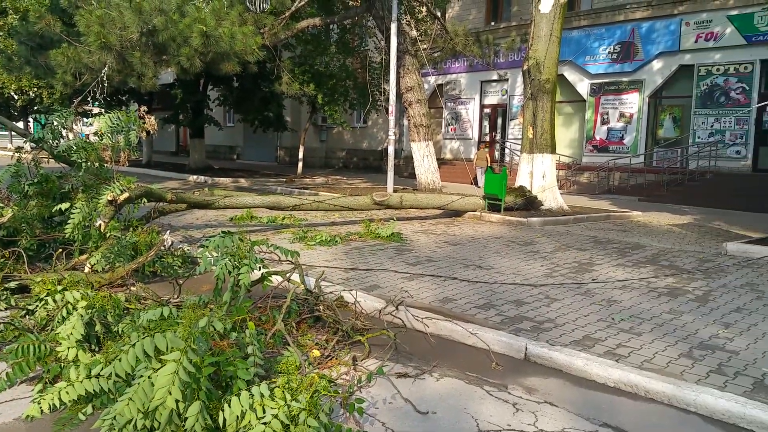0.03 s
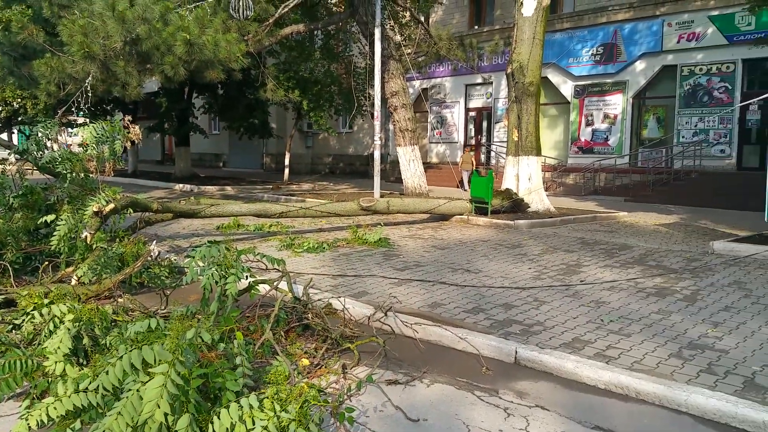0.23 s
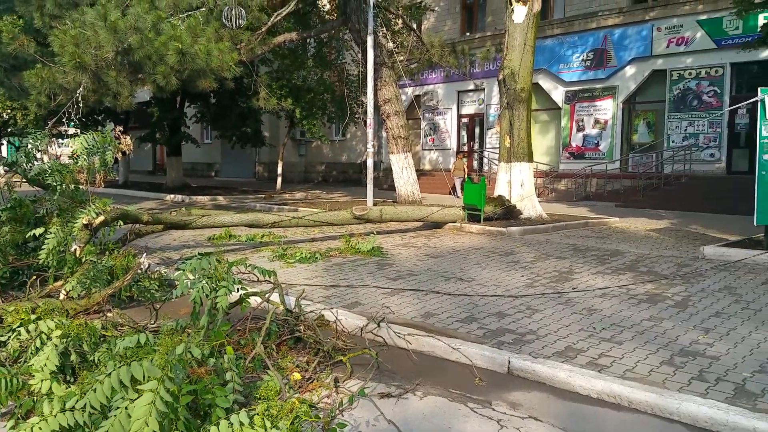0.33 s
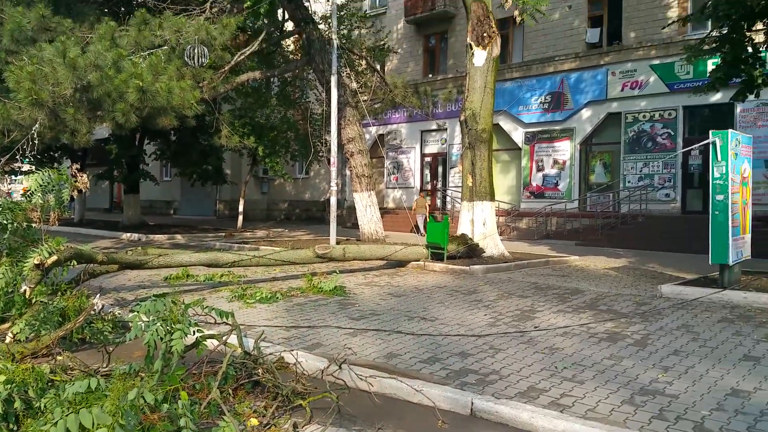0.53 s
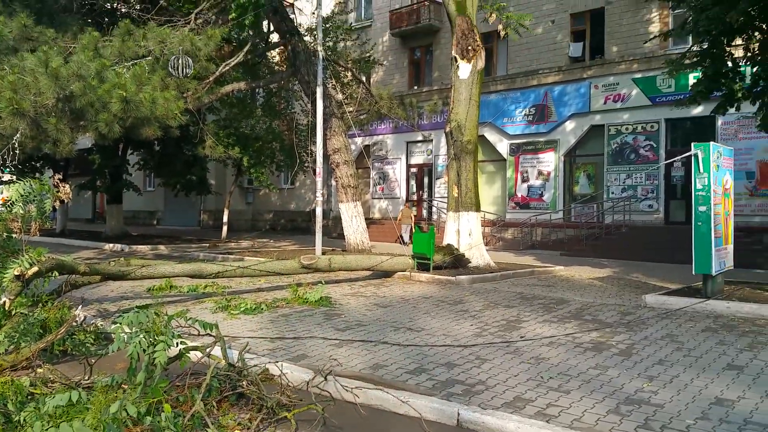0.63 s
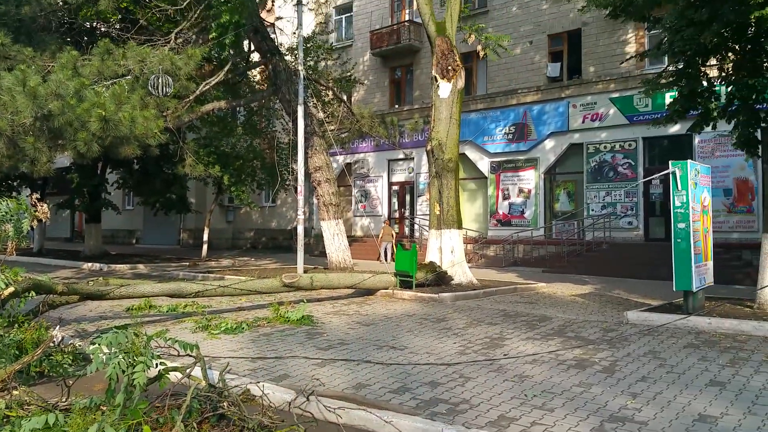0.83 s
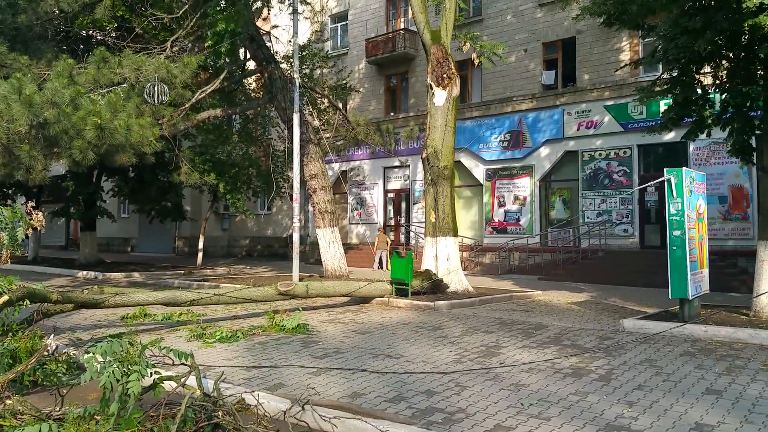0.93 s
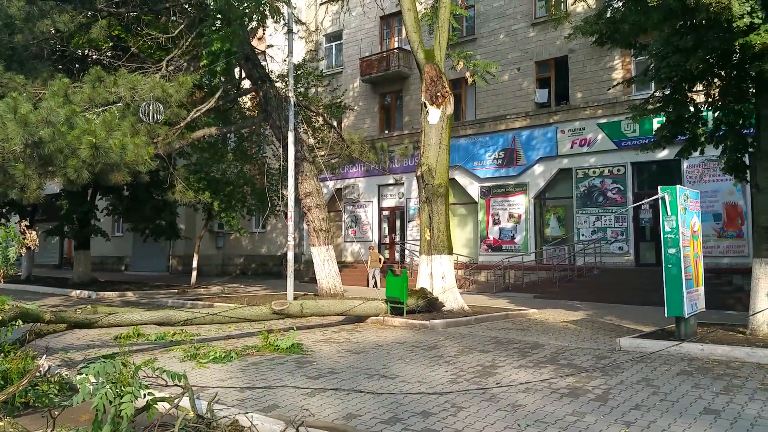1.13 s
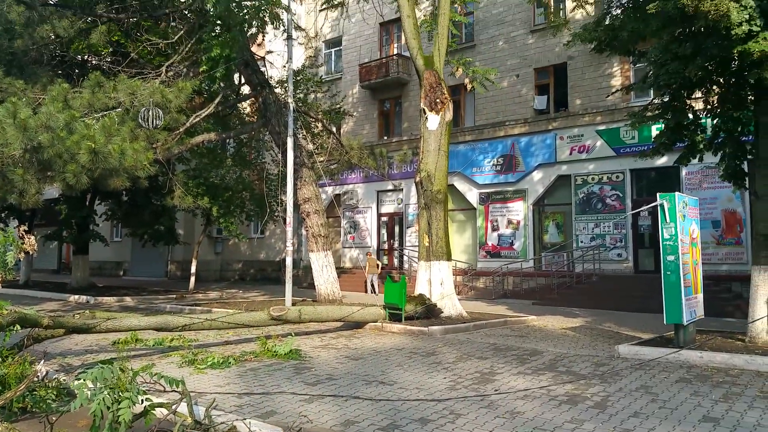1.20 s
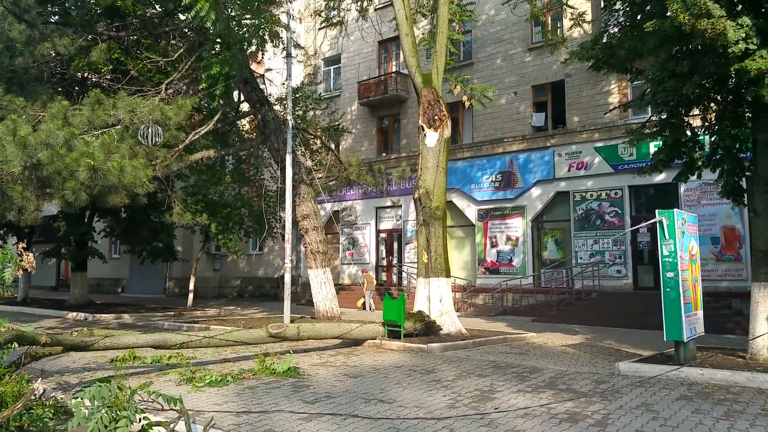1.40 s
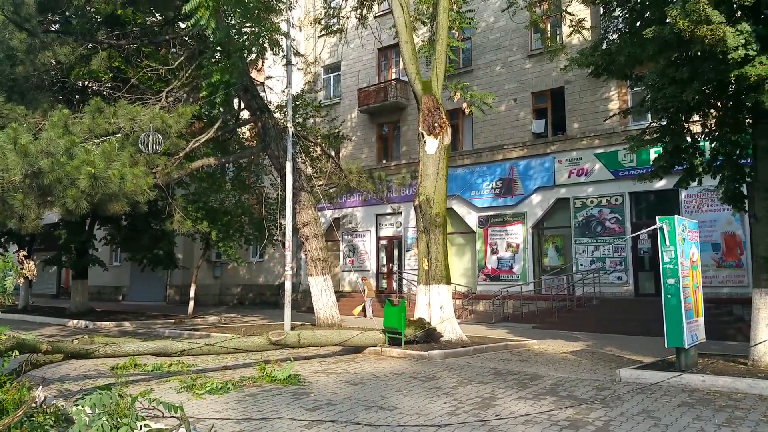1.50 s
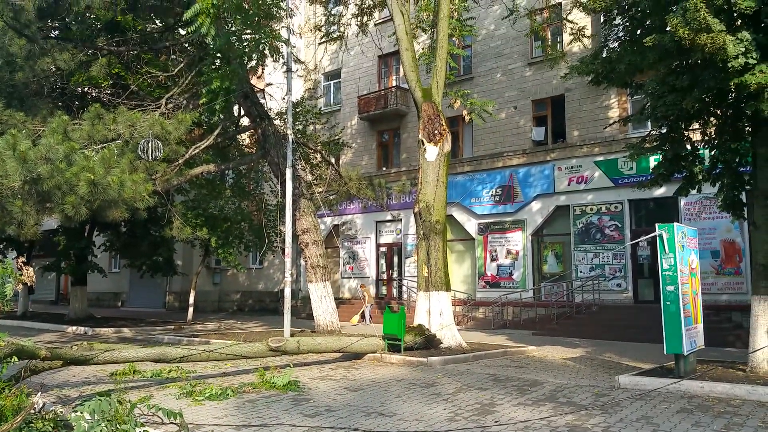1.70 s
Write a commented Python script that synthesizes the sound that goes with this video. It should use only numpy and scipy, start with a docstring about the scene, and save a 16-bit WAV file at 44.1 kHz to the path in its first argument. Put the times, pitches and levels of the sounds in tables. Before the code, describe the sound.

Wind rumbles and thumps on the microphone over distant traffic and faint bird chirps.

```python
"""Breeze on a quiet city street

A breeze rumbles and thumps on the right microphone opening of a hand-held phone, and crackles
where the air breaks over it. Mostly on the left are distant traffic, a fading high hiss and a
small bird whose chirps echo between the house fronts. A hollow swell rises at the very end."""
import sys
import numpy as np
from scipy import signal
from scipy.fft import rfft, irfft
from scipy.io import wavfile
from scipy.ndimage import uniform_filter1d

SR = 44100
rng = np.random.default_rng(int(sys.argv[2]) if len(sys.argv) > 2 else 0)


def wav_record(signal):
    """Record a signal, one row per channel, as 16-bit PCM in the file named by sys.argv[1]."""
    frames = np.transpose(np.atleast_2d(signal))
    bounded = np.clip(frames, -1, 1)
    # unit amplitude maps onto the largest positive 16-bit level
    quanta = np.round(bounded * 32767).astype(np.int16)
    wavfile.write(sys.argv[1], SR, quanta)


N = 77175  # 1.75 s

# Tone of each noise, from low to high (frequency [Hz], relative level [dB])
TRAFFIC_LEFT_TONE = [(20, -8), (60, -5), (110, -0.5), (220, -18.5), (400, -17), (700, -16), (1100, -18.5),
                     (1800, -19), (2900, -28.5), (4100, -25.5), (5000, -35.5), (6000, -46.5), (9000, -56)]
TRAFFIC_RIGHT_TONE = [(20, -12), (110, 1), (250, -3), (550, -9), (1000, -16.5), (2000, -23.5), (4000, -29),
                      (6000, -59)]
SWELL_TONE = [(280, -20), (440, -10), (600, 1), (760, -12), (1100, -11), (1700, -9), (2600, -34.5)]
HIGH_HISS_TONE = [(2000, -53), (3200, -5.5), (3900, 1), (4600, -0.5), (5200, -7.5), (5900, -32),
                  (9000, -62)]
WIND_LEFT_TONE = [(15, -36), (50, -15.5), (100, 2.5), (180, -7), (300, -9.5), (450, -16), (1000, -40),
                  (3000, -56)]
WIND_RIGHT_TONE = [(15, -9.5), (35, -5), (65, -3), (100, -7.5), (170, -14.5), (260, -25), (500, -37),
                   (1000, -55.5), (3000, -70), (6000, -74)]
FIZZ_TONE = [(100, 19.5), (500, -25), (1300, 1), (3000, 1.5), (5800, -6), (8000, -13), (15000, -22)]
MIC_HISS_TONE = [(1000, -21), (6500, -7.5), (8500, 0.5), (9800, 10.5), (11200, 1), (15500, -2)]

# How each noise grows and fades (time [s], level [dB])
TRAFFIC_LEFT_LOUDNESS = [(0, -50.5), (.3, -50), (.7, -50), (1.1, -50.5), (1.5, -50.5), (1.75, -51)]
TRAFFIC_RIGHT_LOUDNESS = [(0, -59), (.22, -50), (.45, -61.5), (1.1, -63.5), (1.75, -62)]
SWELL_LOUDNESS = [(1.62, -85), (1.685, -57), (1.75, -54.5)]
HIGH_HISS_LOUDNESS = [(0, -56.5), (.09, -58), (.2, -60), (.35, -70.5), (.6, -111)]
WIND_LOUDNESS = [(0, -39.5), (.2, -35), (.3, -38), (.42, -39.5), (.6, -37), (.8, -39), (.98, -36.5),
                 (1.12, -37), (1.21, -49.5), (1.34, -46), (1.44, -48.5), (1.54, -51), (1.6, -40.5),
                 (1.75, -56)]

# The bird's notes (start [s], length [s], level [dB], first pitch [Hz], middle pitch [Hz],
# last pitch [Hz], rasp [share of pitch])
BIRD_NOTES = [(0.928, 0.041, -63, 3850, 4620, 3960, 0.038), (0.953, 0.019, -52, 3503, 4050, 3500, 0.059),
              (0.978, 0.0098, -57.5, 3400, 3160, 3250, 0.026), (.990, 0.019, -50, 3400, 3760, 3370, .045),
              (1.223, 0.011, -57, 4280, 4530, 4300, 0.043), (1.271, .12, -69, 3940, 4600, 5050, .015),
              (1.47, 0.065, -66.5, 4700, 4870, 5130, .02)]
# Sudden drops of air pressure (start [s], level [dB], treble cutoff [Hz], extra gain on the left [dB])
PRESSURE_DROPS = [(.275, -15, 1190, -16), (0.2907, -17.5, 1700, -12.5), (0.5652, -34, 3500, -17.5),
                  (1.056, -32, 587, -40), (1.0867, -26, 505, -40), (1.282, -27, 656, -40),
                  (1.382, -28.5, 650, -40)]
# Swirls of air that hit a microphone
# (start [s], level [dB], pitch [Hz], fade time [s], treble cutoff [Hz], side [L or R])
AIR_SWIRLS = [(.228, -14.5, 52, 0.019, 200, "R"), (0.2636, -16, 118.8, 0.018, 340, "R"),
              (0.288, -7, 72, 0.01, 404, "R"), (0.35, -22, 67.4, 0.0071, 250, "R"),
              (.466, -16, 67, 0.012, 297, "R"), (0.531, -25.5, 57.3, .02, 200, "R"),
              (0.705, -20, 58.4, 0.01, 250, "R"), (0.911, -27.5, 68.5, 0.011, 250, "R"),
              (0.974, -19, 59.4, 0.0099, 260, "R"), (1.05, -12, 86, 0.0038, 625, "R"),
              (1.087, -13.5, 73.6, 0.014, 590, "R"), (1.256, -27, 67, 0.012, 300, "R"),
              (1.279, -34, 110, 0.011, 600, "R"), (1.378, -20.5, 87, 0.0042, 600, "R"),
              (1.481, -34, 126, 0.011, 200, "L")]

HIGH_HISS_RIGHT_DB = -25
BIRD_RIGHT_DB, ECHO_DB, ECHO_FADE_S = -28, -2, 0.54
CRACK_FADE_S, FIZZ_FADE_S, FIZZ_SHARE = .002, .0011, 0.074
WIND_LEFT_DB, FLUTTER_DB = -11, 2
MIC_LEFT_DB, MIC_RIGHT_DB, MIC_CUTOFF_HZ = -69.5, -73.5, 15750


def gain(db):
    """Turn decibels into a number to multiply a sound by."""
    return 10 ** (np.asarray(db) / 20)


def loudness_curve(points):
    """A gain for every sample, joining the (time, level) points."""
    return gain(np.interp(np.arange(N) / SR, *np.array(points).T))


def noise(tone):
    """Noise of average strength 1, shaped by (frequency, level) points."""
    hz, db = np.array(tone).T
    frequencies = np.maximum(np.arange(N // 2 + 1) * SR / N, 1)
    shape = gain(np.interp(np.log(frequencies), np.log(hz), db))
    sound = irfft(rfft(rng.standard_normal(N)) * shape, N)
    return sound / sound.std()


def wobble(rate):
    """A smooth random wobble of typical size 1, with `rate` new values a second."""
    hold = max(int(SR / rate), 2)
    values = rng.standard_normal(N)[np.arange(N) // hold]
    for _ in range(2):
        values = uniform_filter1d(values, hold, mode="constant")
    return values / values.std()


def muffle(sound, cutoff_hz):
    """Soften the treble above the cutoff."""
    return signal.sosfilt(signal.butter(2, min(cutoff_hz, SR / 3), fs=SR, output="sos"), sound)


def traffic():
    """Distant cars blur into a low rush, duller and weaker on the right."""
    left = noise(TRAFFIC_LEFT_TONE) * loudness_curve(TRAFFIC_LEFT_LOUDNESS)
    right = noise(TRAFFIC_RIGHT_TONE) * loudness_curve(TRAFFIC_RIGHT_LOUDNESS)
    return np.array([left, right])


def hollow_swell():
    """A brief, far-off hollow sound rises on the left at the end."""
    left = noise(SWELL_TONE) * loudness_curve(SWELL_LOUDNESS)
    return np.array([left, np.zeros(N)])


def high_hiss():
    """A high hiss, mostly on the left, fades away in the first half second."""
    left = noise(HIGH_HISS_TONE)
    right = gain(HIGH_HISS_RIGHT_DB) * noise(HIGH_HISS_TONE)
    return np.array([left, right]) * loudness_curve(HIGH_HISS_LOUDNESS)


def street_echo(sound):
    """Sound bounces between the house fronts, dying away by 60 dB in ECHO_FADE_S."""
    t = np.arange(N) / SR
    build_up = 1 - np.exp(-t / 0.0047)
    tail = rng.standard_normal((2, N)) * np.exp(-np.log(1000) * t / ECHO_FADE_S) * build_up
    tail /= np.sqrt(np.sum(tail ** 2, axis=1, keepdims=True))
    return signal.fftconvolve(sound[None], tail, axes=1)[:, :N]


def bird():
    """A small bird on the left sings quick chirps and faint rising whistles, which echo."""
    t, song = np.arange(N) / SR, np.zeros(N)
    waver = wobble(900)  # a pitch that shakes this fast sounds raspy
    for start, length, db, first_hz, middle_hz, last_hz, rasp in BIRD_NOTES:
        progress = np.clip((t - start) / length, 0, 1)
        pitch_bend = np.polyfit([0, .5, 1], [first_hz, middle_hz, last_hz], 2)
        hz = np.polyval(pitch_bend, progress) * (1 + rasp * waver)
        fade_in_out = np.sqrt(np.abs(np.sin(np.pi * progress)))
        song += gain(db) * fade_in_out * np.sin(2 * np.pi * np.cumsum(hz) / SR)
    return (song + gain(ECHO_DB) * street_echo(song)) * gain([[0], [BIRD_RIGHT_DB]])


def wind_crackles():
    """Air breaks over the right microphone and sucks at it for an instant; the left gets only fizz."""
    t, out = np.arange(N) / SR, np.zeros((2, N))
    for start, db, cutoff_hz, left_db in PRESSURE_DROPS:
        jump = gain(db) * (t >= start)
        age = np.maximum(t - start, 0)
        out[0] += gain(left_db) * jump * np.exp(-age / FIZZ_FADE_S) * noise(FIZZ_TONE)
        suction = jump * np.exp(-age / CRACK_FADE_S)
        out[1] -= muffle(suction * (1 + FIZZ_SHARE * noise(FIZZ_TONE)), cutoff_hz)
    return out


def wind_rumble():
    """Churning air rumbles on the microphones, stronger and more uneven on the right."""
    right = noise(WIND_RIGHT_TONE) * gain(FLUTTER_DB * wobble(23.8))
    left = gain(WIND_LEFT_DB) * noise(WIND_LEFT_TONE)
    return np.array([left, right]) * loudness_curve(WIND_LOUDNESS)


def wind_thumps():
    """Each swirl of air gives one microphone a push that swings back and dies away."""
    t, out = np.arange(N) / SR, np.zeros((2, N))
    for start, db, hz, fade_s, cutoff_hz, side in AIR_SWIRLS:
        age = np.maximum(t - start, 0)
        push = np.sin(2 * np.pi * hz * age) * np.exp(-age / fade_s)
        out["LR".index(side)] += gain(db) * muffle(push, cutoff_hz)
    return out


def scene():
    """Wind on the phone over the street and the bird, as a left and a right channel."""
    wind = wind_rumble() + wind_thumps() + wind_crackles()
    return wind + traffic() + hollow_swell() + high_hiss() + bird()


def record(dry):
    """The microphones add their own hiss, sharper on the left; the phone cuts the highest treble."""
    left_hiss = gain(MIC_LEFT_DB) * noise(MIC_HISS_TONE)
    right_hiss = gain(MIC_RIGHT_DB) * rng.standard_normal(N)
    treble_cut = signal.ellip(10, .1, 80, MIC_CUTOFF_HZ, fs=SR, output="sos")
    return signal.sosfilt(treble_cut, dry + np.array([left_hiss, right_hiss]))


dry = scene()
out = record(dry)
wav_record(out)
```